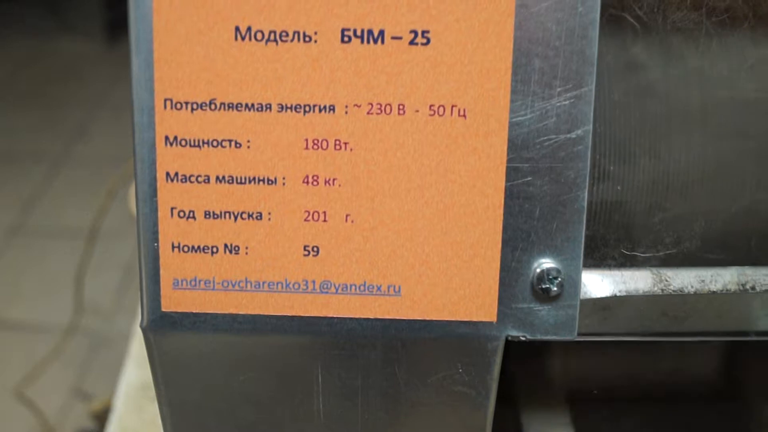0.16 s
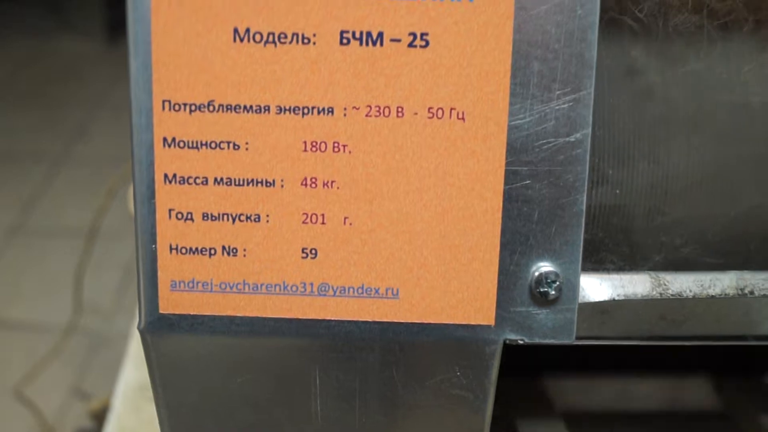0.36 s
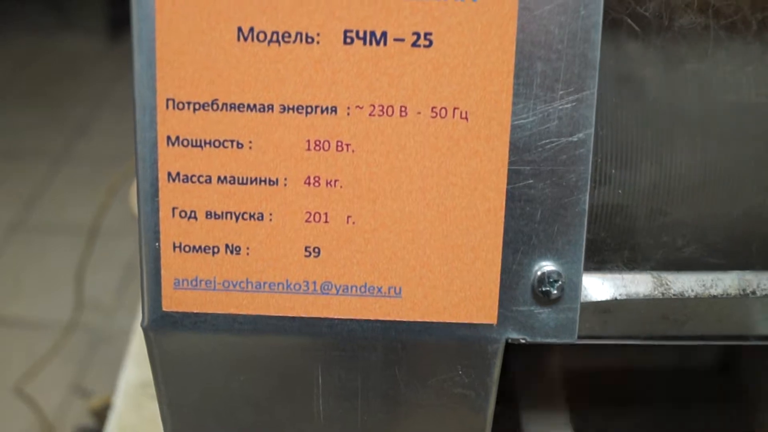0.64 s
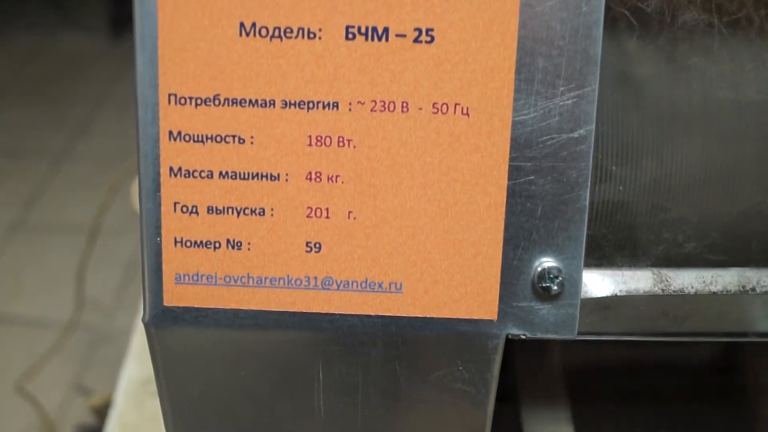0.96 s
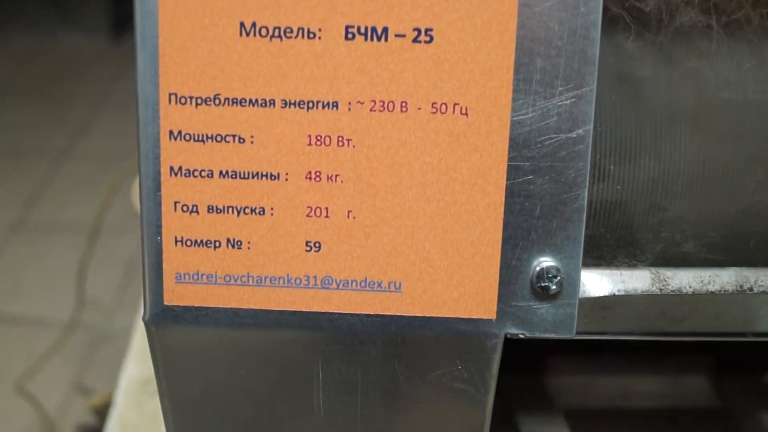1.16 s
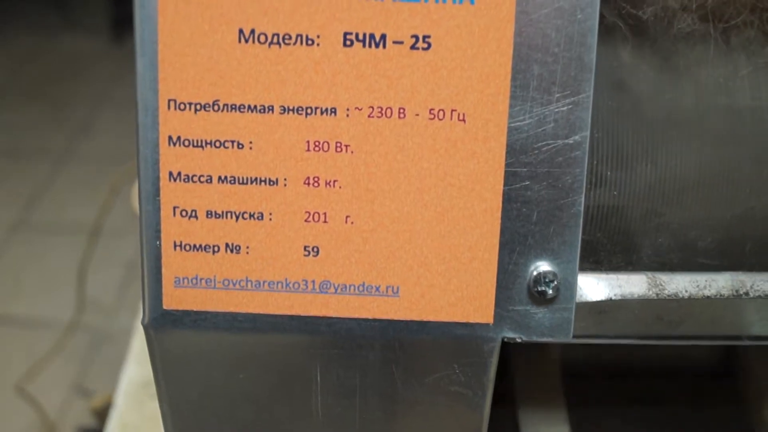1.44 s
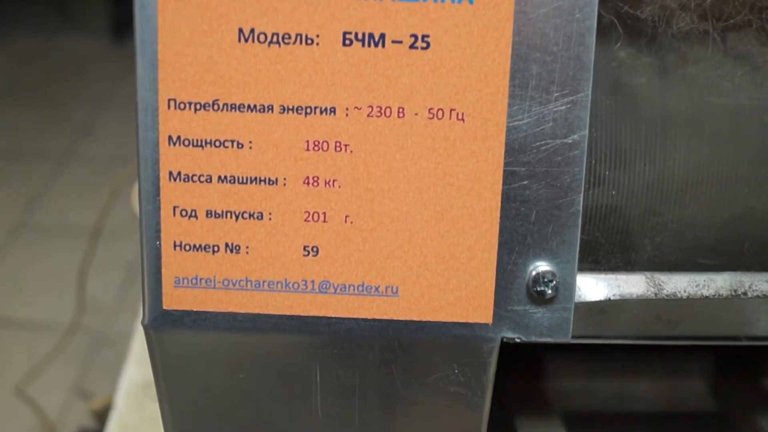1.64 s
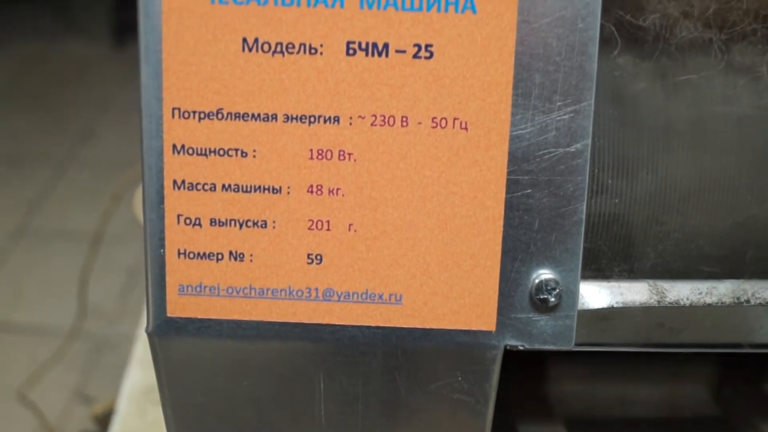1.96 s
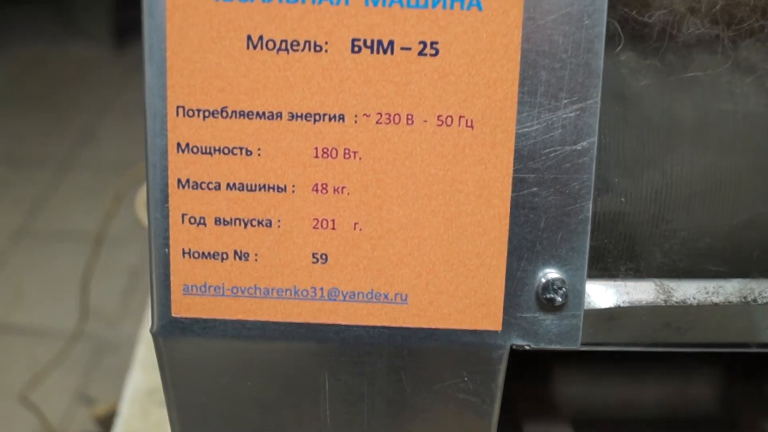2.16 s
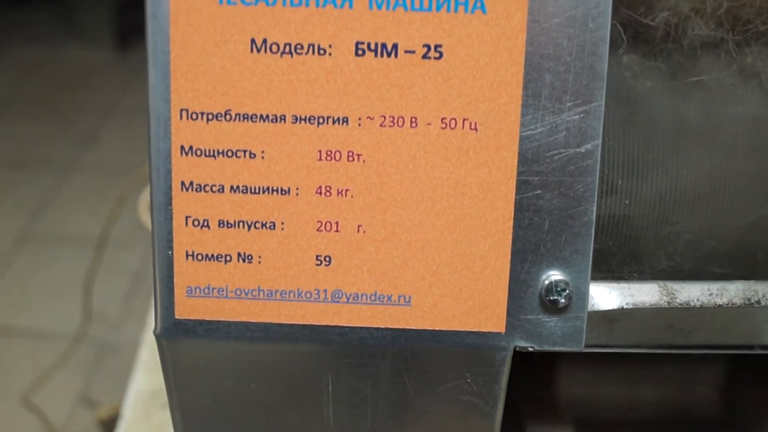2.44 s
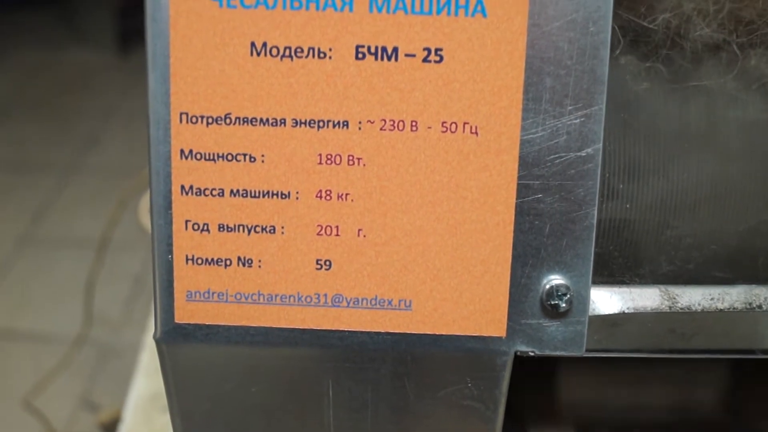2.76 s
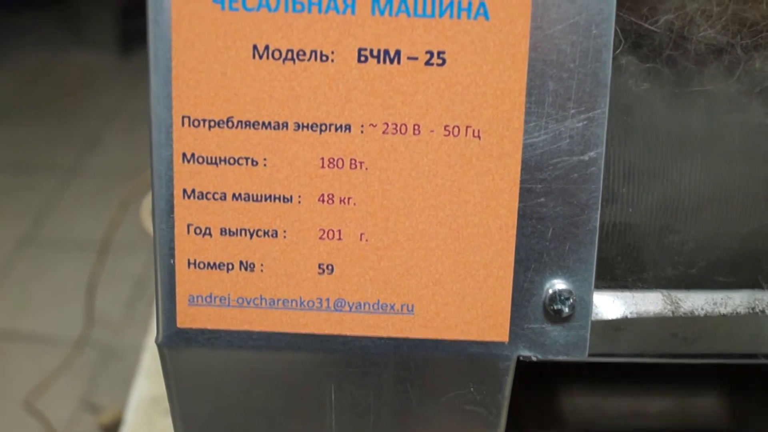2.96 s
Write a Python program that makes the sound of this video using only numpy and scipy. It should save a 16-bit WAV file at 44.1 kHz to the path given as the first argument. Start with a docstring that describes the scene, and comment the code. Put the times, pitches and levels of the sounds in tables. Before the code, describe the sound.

Close stereo pickup of a small motor-driven carding machine running continuously in a small room; its metal frame chatters, wire teeth hiss, tick and rattle irregularly, and a thin whine swells now and then.

```python
"""A small wool carding machine indoors, close to a stereo microphone and a little to its right.
Silence, then just under a tenth of a second in the machine is abruptly there, already running: chattering
noise rings its sheet-metal frame, a wavering sine is the gear whine, and shaped noise is the hiss of wire teeth.
From then on the hiss flares in quick rattles that also push the frame, among random ticks and short sine pings.
The frame tones near the gear's pitch swell with it, most near 2.0 and 2.7 s; a small room answers faintly."""
import sys
import numpy as np
from scipy import signal
from scipy.fft import rfft, irfft
from scipy.io import wavfile
from scipy.ndimage import uniform_filter1d

SR = 44100
rng = np.random.default_rng(int(sys.argv[2]) if len(sys.argv) > 2 else 0)


def master(y):
    """Save y as 16-bit WAV."""
    cut = np.clip(np.atleast_2d(y).T, -1, 1)
    pcm = np.round(cut * 32767)  # scale
    wavfile.write(sys.argv[1], SR, pcm.astype(np.int16))


N = 136269
HZ = np.fft.rfftfreq(N, 1 / SR)
T = np.arange(N) / SR


def undb(db):
    """Decibels to gain."""
    return 10 ** (np.asarray(db) / 20)


def over_hz(table):
    """Read a (pitch_hz, value) table on a log-frequency axis."""
    hz, value = np.array(table, float).T
    return np.interp(np.log(HZ + 1), np.log(hz + 1), value)


def over_time(table):
    """Read a (time_s, level_db) table as straight lines between its points."""
    time_s, level_db = np.array(table).T
    return np.interp(T, time_s, level_db)


def unit(x):
    """Scale to rms 1."""
    return x / np.sqrt(np.mean(x ** 2))


def shape(x, gain):
    """Filter by a gain per frequency, then scale to rms 1."""
    return unit(irfft(rfft(x) * gain, N))


def walk(rate):
    """Wandering control: random levels held 1 / rate s and smoothed twice; mean 0, spread 1."""
    hold = int(SR / rate)
    steps = np.repeat(rng.standard_normal(N // hold + 1), hold)
    smooth = uniform_filter1d(uniform_filter1d(steps, hold), hold)[:N]
    return (smooth - smooth.mean()) / smooth.std()


def bursts(times, db, attack, decay):
    """Power envelope of bursts that rise fast and die away exponentially."""
    marks = np.zeros(N)
    places = np.clip((np.asarray(times) * SR).astype(int), 0, N - 1)
    np.add.at(marks, places, undb(db) ** 2)
    tau = np.arange(SR // 5) / SR
    form = (1 - np.exp(-tau / attack)) * np.exp(-tau / decay)
    return np.maximum(signal.fftconvolve(marks, form / form.max())[:N], 0)


# How alike the two microphone channels are: pitch_hz, shared_power (0-1, clipped there)
CHANNEL_LIKENESS = [(60, .3), (130, 0.27), (270, 1.22), (560, 0.7), (1170, 0.52), (2470, .5), (5180, 0.25),
                    (10900, 0.34)]
# Left channel minus right: pitch_hz, balance_db
LEFT_MINUS_RIGHT = [(130, 0), (340, -4), (610, -6), (1080, -4), (1920, -4.5), (3430, -2), (6110, -4.5),
                    (10900, -2)]
LEFT_LAG_S = 2e-5  # the shared sound reaches the left later


def microphone_pair(grain):
    """Two-channel noise: a shared part, later and mostly weaker on the left, and a part of each channel's own."""
    likeness = np.clip(over_hz(CHANNEL_LIKENESS), 0, 1)
    shared_gain, own_gain = np.sqrt(likeness), np.sqrt(1 - likeness)
    shared, left, right = (rfft(grain * rng.standard_normal(N)) for _ in range(3))
    late = np.exp(-2j * np.pi * HZ * LEFT_LAG_S)
    tilt = undb(over_hz(LEFT_MINUS_RIGHT) / 2)
    left_mix = tilt * (shared_gain * shared * late + own_gain * left)
    right_mix = (shared_gain * shared + own_gain * right) / tilt
    return irfft(np.array([left_mix, right_mix]), N)


ECHO_T60_S, ECHO_GAP_S = .22, .01
ECHO_DB = -13  # all echoes together, against the direct sound


def small_room(direct):
    """Faint dense echoes of a small room: decaying noise after a short gap, with overall power held."""
    tau = np.arange(int(ECHO_T60_S * SR)) / SR
    echoes = rng.standard_normal(len(tau)) * undb(-60 * tau / ECHO_T60_S) * (tau > ECHO_GAP_S)
    echoes = undb(ECHO_DB) * echoes / np.sqrt(np.sum(echoes ** 2))
    echoes[0] = 1  # the direct sound
    heard = signal.fftconvolve(direct, echoes[None], axes=1)[:, :N]
    return heard / np.sqrt(1 + undb(ECHO_DB) ** 2)


# Swell of the gear and of the frame tones near its pitch: time_s, level_db (added to their own levels)
WHINE_SWELL = [(.1, -2), (.35, 1), (.6, -1), (.92, 3), (1.15, -3), (1.3, 2.5), (1.6, -5.5), (1.82, -1.5),
               (1.95, 5.5), (2.1, -0.5), (2.35, -1), (2.6, -0.5), (2.7, 8.5), (2.82, -1), (3.05, 2.5)]
GEAR_HZ, GEAR_WANDER_HZ = 1682, 16
GEAR_DB, GEAR_ROUGH_DB = -32.5, 3  # level before swell and panning, spread of its roughness


def gear():
    """Meshing gear teeth: a sine of wavering pitch and rough level; frame tones near its pitch swell with it."""
    phase = 2 * np.pi * np.cumsum(GEAR_HZ + GEAR_WANDER_HZ * walk(14)) / SR
    balance_db = np.interp(GEAR_HZ, HZ, over_hz(LEFT_MINUS_RIGHT)) * np.array([[1], [-1]])
    level_db = GEAR_DB + GEAR_ROUGH_DB * walk(39.8) + over_time(WHINE_SWELL) + balance_db / 2
    return np.sqrt(2) * np.sin(phase) * undb(level_db)


# Broad colour of the sheet-metal frame: pitch_hz, level_db (relative, per Hz)
FRAME_COLOUR = [(24, -71), (40, -35), (103, -40.5), (196, -13.5), (314, -14.5), (385, -13.5), (440, -6),
                (520, -6), (640, -1.5), (790, -8), (912, -2), (1290, -12), (1650, -3.5), (2040, -48),
                (2600, -47), (3380, -51), (5720, -120)]
# Pitches at which the frame rings: pitch_hz
FRAME_RING_HZ = [191, 268, 300, 358, 435, 458, 497, 559, 610, 645, 702, 880, 930, 1021, 1100, 1168, 1482,
                 1682, 1706, 1915, 2558, 3477, 4320]
# One row for each of those pitches: width_hz, level_db (relative, against the body)
FRAME_RINGS = [(10, -45), (4.4, -35.5), (5.8, -44), (20, -38), (21.4, -30), (25, -31.5), (15, -35),
               (12, -30), (19.9, -35.5), (25, -35), (20, -37.5), (38.4, -29), (30, -39), (58, -29),
               (25, -39.5), (18.8, -36.5), (46.3, -33.5), (12, -31.5), (12, -37.5), (28, -40), (32, -39.5),
               (24.2, -35), (54, -50)]
# Level of the whole frame sound before its wander: time_s, level_db
FRAME_LEVEL = [(0.1, -18), (0.43, -17), (0.47, -20), (0.52, -16), (0.54, -18.5), (0.93, -16), (1.02, -19.5),
               (1.04, -14), (1.06, -19), (1.08, -16.5), (1.18, -19), (1.24, -15.5), (1.47, -17.5),
               (1.57, -17), (1.59, -18.5), (1.66, -18), (2.54, -17), (2.59, -18.5), (2.61, -16.5),
               (2.98, -16.5), (3.03, -14), (3.09, -19)]
BODY_DB = -14.5  # broad body, relative to the rings
CHATTER_PER_S, CHATTER_SCATTER_DB = 1500, 2
KNOCK_DEPTH = 1.12  # chatter power added by a full rattle push
WANDER_ALL_DB, WANDER_RING_DB = 0.38, 2  # whole frame; drive of each low ring, less for high rings
SWELL_BAND_HZ = 1400, 1950  # rings in this band swell with the gear


def frame(knock):
    """Dense uneven chatter of motor, belt and rollers, pushed by rattles, rings the frame and its modes."""
    hold = int(SR / CHATTER_PER_S)
    steps = np.repeat(rng.standard_normal(N // hold + 1), hold)[:N]
    chatter = undb(CHATTER_SCATTER_DB * steps)
    drive = microphone_pair(chatter * np.sqrt(1 + KNOCK_DEPTH * knock))
    treble_cut = 1 + (HZ / 2600) ** 8
    out = undb(BODY_DB) * shape(drive, undb(over_hz(FRAME_COLOUR)) / treble_cut)
    for hz, (width, db) in zip(FRAME_RING_HZ, FRAME_RINGS):
        wander_db = WANDER_RING_DB * walk(9.02) / (1 + (hz / 2200) ** 4)
        # resonance with its low side thinned
        resonance = 1 / (width / 2 + 1j * (HZ - hz)) * (HZ / (HZ + hz)) ** 2
        ring = shape(drive * undb(wander_db), resonance)
        if SWELL_BAND_HZ[0] < hz < SWELL_BAND_HZ[1]:
            ring = ring * undb(over_time(WHINE_SWELL))
        out = out + undb(db) * ring
    return unit(out) * undb(over_time(FRAME_LEVEL) + WANDER_ALL_DB * walk(14))


PINGS_PER_S, PING_T60_S = 420, .06  # each ping is cut off after 1/25 s
PING_BAND_HZ = 2200, 10800
PING_DB, PING_SCATTER_DB = -34.5, 8  # loudest ping at average brushing, range below it
PING_PAN_DB = 6  # farthest to either side of the machine's own balance


def pings(effort):
    """Single wire teeth spring free: short decaying sines at random pitches, louder in strong brushing."""
    when, pitch, size, side = rng.random((int(PINGS_PER_S * N / SR), 4)).T
    tau = np.arange(SR // 25) / SR
    low_hz, high_hz = PING_BAND_HZ
    hz = low_hz * (high_hz / low_hz) ** pitch
    start = (when * N).astype(int)
    decay = undb(-60 * tau / PING_T60_S) * np.minimum(tau / .001, 1)  # 1 ms onset
    level = undb(PING_DB - PING_SCATTER_DB * size) * effort[start]
    ring = np.sin(2 * np.pi * hz[:, None] * tau) * decay * level[:, None]
    place = (start[:, None] + np.arange(len(tau))).ravel()
    pan_db = PING_PAN_DB * (2 * side - 1) + np.interp(hz, HZ, over_hz(LEFT_MINUS_RIGHT))
    channels = []
    for way in (1, -1):  # left, right
        panned = ring * undb(way * pan_db / 2)[:, None]
        channels.append(np.bincount(place, panned.ravel(), N + len(tau))[:N])
    return np.array(channels)


# Broad colour of the wire teeth: pitch_hz, level_db (relative, per Hz)
WIRE_COLOUR = [(1060, -37), (1800, 15.5), (2080, -2.5), (2580, -1), (2980, -7.5), (3520, -2), (3800, -8),
               (4280, -3.5), (4650, -11.5), (5210, -8.5), (6100, -10), (9300, -7.5), (10900, -11),
               (14200, -35), (22000, -120)]
# Ringing of the wire teeth: pitch_hz, width_hz, lift_db
WIRE_RINGS = [(2323, 40, 3), (2840, 50, 3), (3860, 30, 4), (5088, 60, 4), (5302, 50, 3), (5595, 50, 3),
              (5990, 60, 3), (6401, 70, 5), (6554, 50, 3), (7010, 70, 3), (7494, 150, 3), (8393, 180, 4),
              (8960, 80, 4), (9153, 70, 4), (9638, 150, 4), (10130, 70, 4), (10310, 60, 3)]
SCRATCH_DB = 1.6  # spread of the fast roughness
FLUTTER_DB, FLUTTER_PER_S = 2, 25  # spread and rate within each narrow band


def brushing_noise():
    """Wire teeth brushing past each other: rough noise coloured by their ringing, each band fluttering alone."""
    colour = undb(over_hz(WIRE_COLOUR)) / (1 + (1900 / (HZ + 1)) ** 8)
    for hz, width, db in WIRE_RINGS:
        colour = colour * undb(db / (1 + (2 * (HZ - hz) / width) ** 2))
    noise = microphone_pair(undb(SCRATCH_DB * walk(900)))
    hiss = 0
    for hz in 1200 * 2 ** np.arange(0, 3.4, .2):  # overlapping bands a fifth of an octave apart
        share = np.clip(1 - np.abs(np.log2((HZ + 1) / hz)) / .2, 0, 1)
        band = irfft(rfft(noise) * share * colour, N)
        hiss = hiss + band * undb(FLUTTER_DB * walk(FLUTTER_PER_S))
    return hiss


# Steady brushing, both bands together: time_s, level_db
BRUSH_LEVEL = [(.09, -30), (.3, -30), (.42, -30), (.45, -29.5), (.53, -27.5), (.58, -32.5), (.63, -29),
               (.67, -37), (.76, -28), (.87, -28), (.92, -24.5), (.96, -35), (1.02, -25.5), (1.06, -33),
               (1.1, -27), (1.17, -31.5), (1.23, -27.5), (1.4, -29), (1.55, -27), (1.585, -35),
               (1.625, -34.5), (1.66, -27), (1.84, -27), (1.92, -32), (1.97, -26), (2.02, -30.5),
               (2.08, -28.5), (2.3, -28.5), (2.52, -27), (2.59, -33.5), (2.64, -29), (2.71, -33.5),
               (2.76, -26), (2.97, -28.5), (3.03, -29.5), (3.09, -31)]
# Rattles of the wire teeth: start_s, push_db (on the frame, before the lift below),
# low_db (below the split), high_db (above the split)
WIRE_RATTLES = [(0.0869, -25, -39, -32), (0.1133, -29, -28.5, -30), (0.1476, -29, -28.5, -29),
                (0.2177, -18, -42, -30.5), (0.29, -10, -40, -27.5), (0.3645, -12.5, -38, -36),
                (0.499, -14, -39, -30), (0.617, -14, -24.5, -24), (0.683, -31, -31, -28.5),
                (0.7254, -17.5, -41, -24), (0.911, -23, -32, -29), (0.975, -9, -30, -26.5),
                (1.02, -13, -28, -35.5), (1.0725, -13.5, -38, -29.5), (1.205, -24, -36, -25),
                (1.272, -18, -32, -30), (1.3275, -36, -33, -26.5), (1.3684, -26, -30, -27),
                (1.4697, -12, -29, -30), (1.55, -10.5, -30, -29), (1.6368, -8, -37, -34),
                (1.6638, -21, -29, -46), (1.7032, -7, -27.5, -39), (1.7606, -26, -37, -31),
                (1.843, -12, -34, -26), (1.866, -13, -22.5, -31), (1.951, -16, -41, -27),
                (1.9835, -21, -38, -27), (2.055, -12, -35, -27), (2.0813, -13, -25, -44),
                (2.1377, -16, -30.5, -35), (2.2135, -16, -40, -49), (2.3976, -15, -28, -27),
                (2.456, -22, -24, -46), (2.6044, -11.5, -27, -28), (2.6735, -37, -51, -27),
                (2.7478, -21, -32, -29), (2.891, -37, -38, -28), (2.9374, -35, -26.5, -37),
                (3.0425, -15, -25, -27.5)]
RATTLE_ATTACK_S, RATTLE_DECAY_S = 0.0047, 0.01
RATTLE_PUSH_LIFT_DB = 10.5
TICKS_PER_S, TICK_ATTACK_S, TICK_DECAY_S = 71, 0.0016, 0.0077
TICK_DB, TICK_SCATTER_DB = -31.5, 13  # loudest tick, range below it
SPLIT_HZ = 5180


def wires():
    """Wire teeth hiss, tick at random and flare in rattles; also returns the rattles' limited push on the frame."""
    steady = undb(over_time(BRUSH_LEVEL)) ** 2 / 2  # half the power to each band
    tick_place, tick_low, tick_high = rng.random((int(TICKS_PER_S * N / SR), 3)).T
    start_s, push_db, low_db, high_db = np.array(WIRE_RATTLES).T
    hiss = brushing_noise()
    upper = 1 / np.sqrt(1 + (SPLIT_HZ / (HZ + 1)) ** 8)
    lower = np.sqrt(1 - upper ** 2)
    out, power = 0, 0
    for gain, rattle_db, size in ((lower, low_db, tick_low), (upper, high_db, tick_high)):
        rattle = bursts(start_s, rattle_db, RATTLE_ATTACK_S, RATTLE_DECAY_S)
        tick_db = TICK_DB - TICK_SCATTER_DB * size
        ticks = bursts(tick_place * N / SR, tick_db, TICK_ATTACK_S, TICK_DECAY_S)
        band_power = steady + rattle + ticks
        out = out + shape(hiss, gain) * np.sqrt(band_power)
        power = power + band_power
    effort = unit(np.sqrt(power))
    push = bursts(start_s, push_db + RATTLE_PUSH_LIFT_DB, RATTLE_ATTACK_S, RATTLE_DECAY_S)
    return out + pings(effort), np.tanh(push)


def scene():
    """Frame rumble, gear whine and wire hiss together in the small room."""
    hiss, knock = wires()
    return small_room(frame(knock) + gear() + hiss)


START_S, FADE_IN_S = .0812, .007
MIC_LOW_HZ, TOP_HZ = 90, 11025
HEADROOM = 1.15  # ceiling of the soft rounding, full scale = 1


def record(dry):
    """The recorder opens with a short fade, thins deep bass, rounds the loudest peaks and cuts the top steeply."""
    fade = np.clip((T - START_S) / FADE_IN_S, 0, 1)
    bass_cut = signal.butter(2, MIC_LOW_HZ, "high", fs=SR, output="sos")
    thin = signal.sosfilt(bass_cut, dry)
    rounded = HEADROOM * np.tanh(thin * fade / HEADROOM)
    top_cut = signal.ellip(18, .3, 85, TOP_HZ, fs=SR, output="sos")
    return signal.sosfilt(top_cut, rounded)


dry = scene()
out = record(dry)
master(out)
```